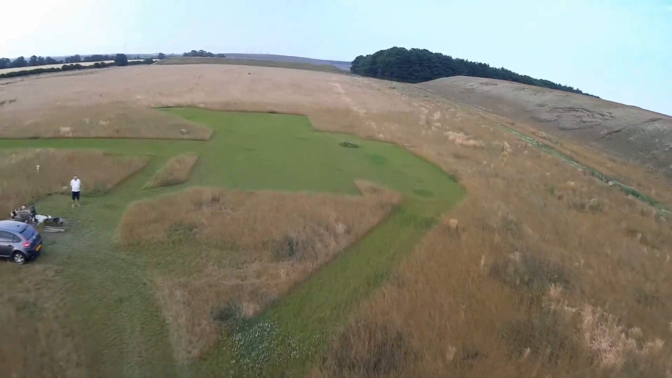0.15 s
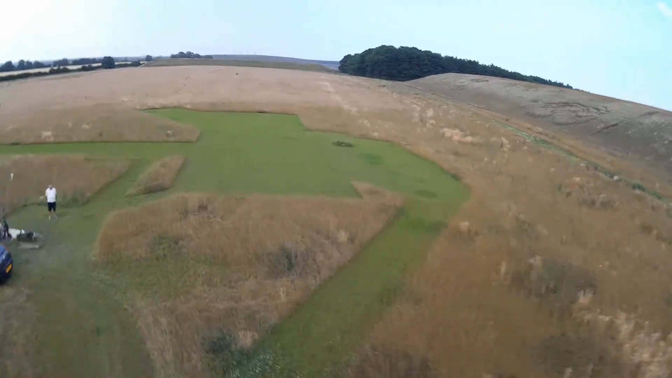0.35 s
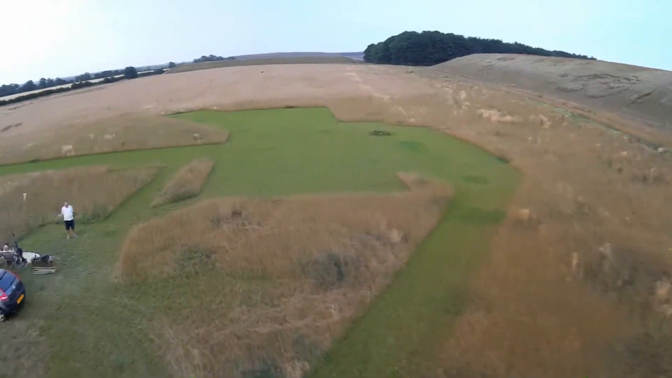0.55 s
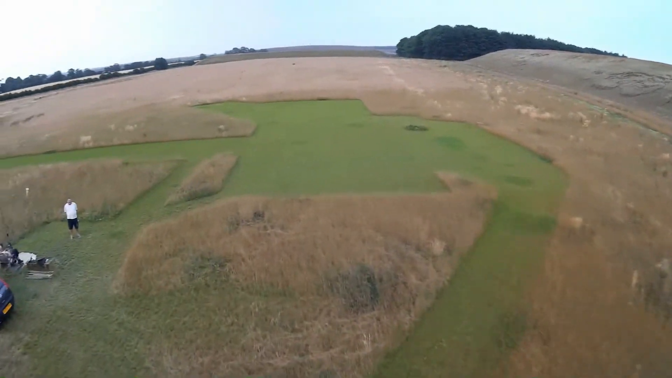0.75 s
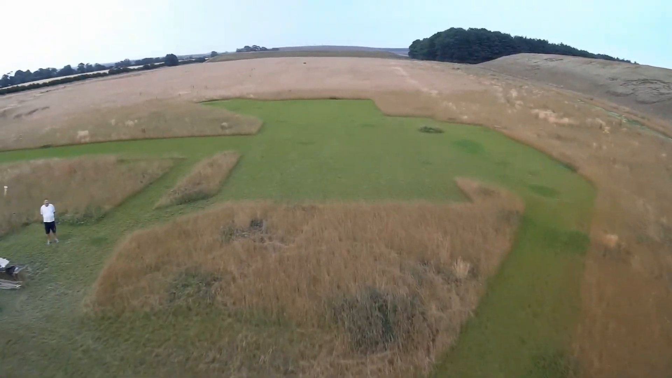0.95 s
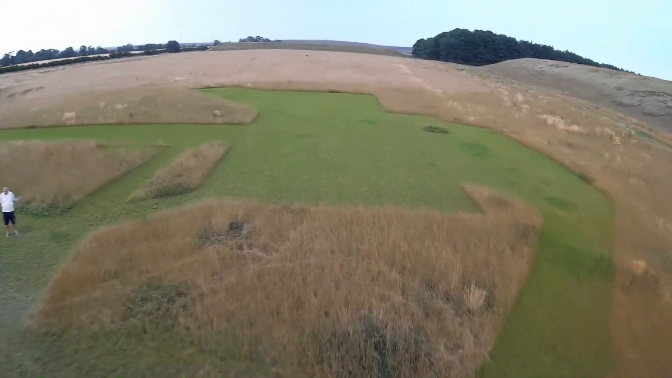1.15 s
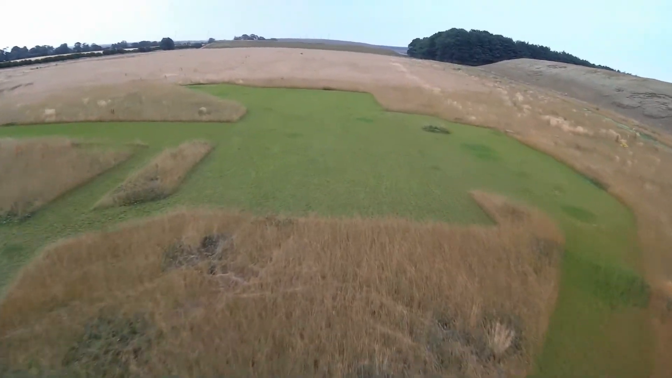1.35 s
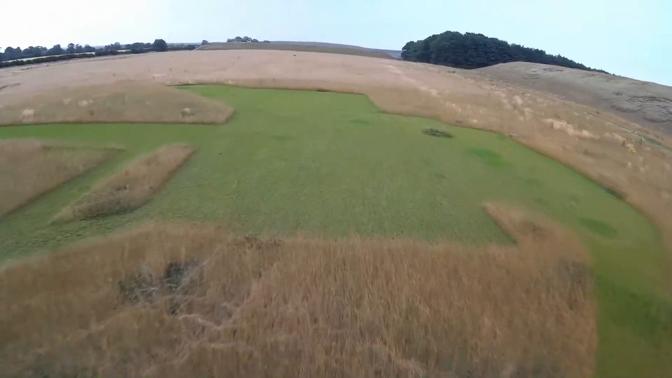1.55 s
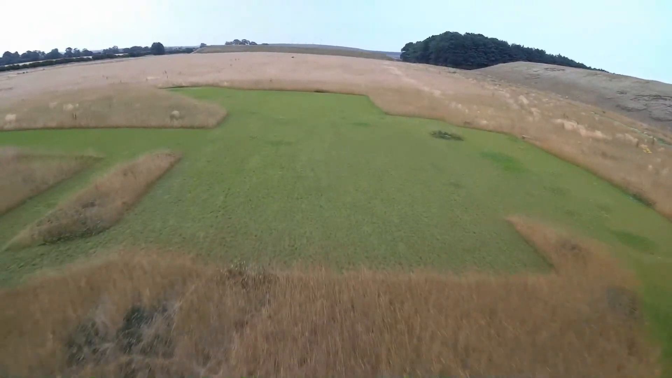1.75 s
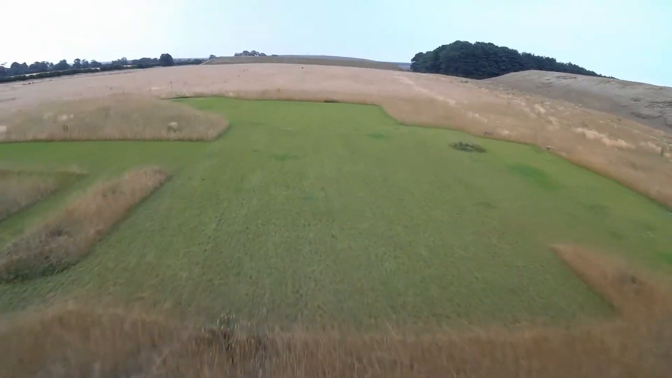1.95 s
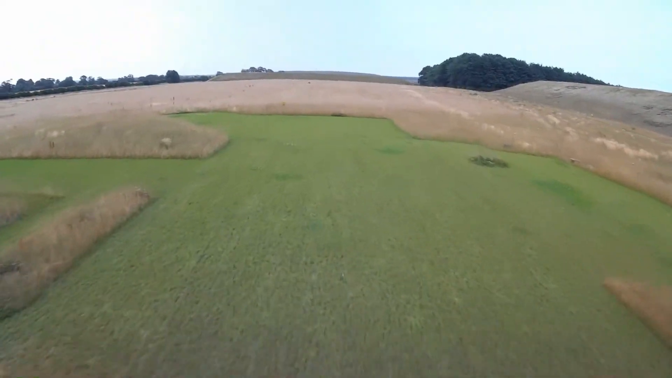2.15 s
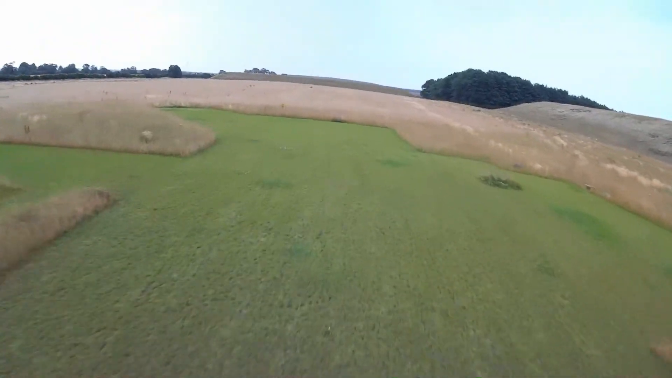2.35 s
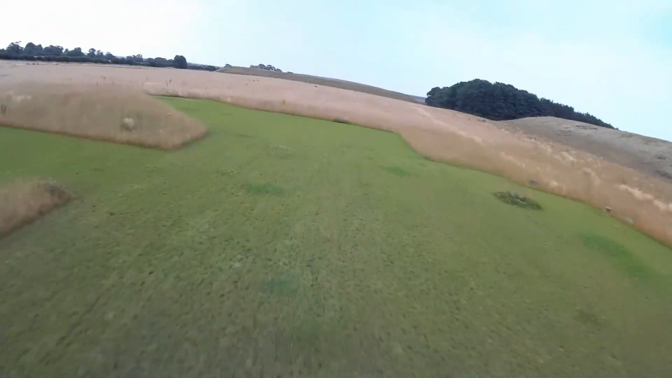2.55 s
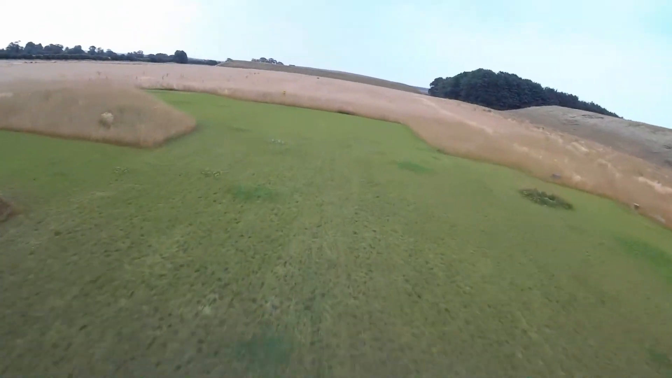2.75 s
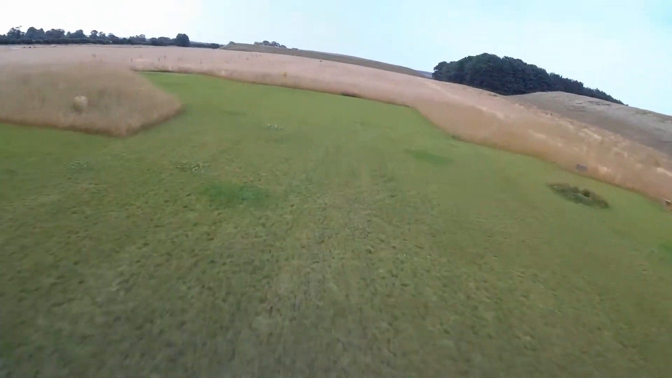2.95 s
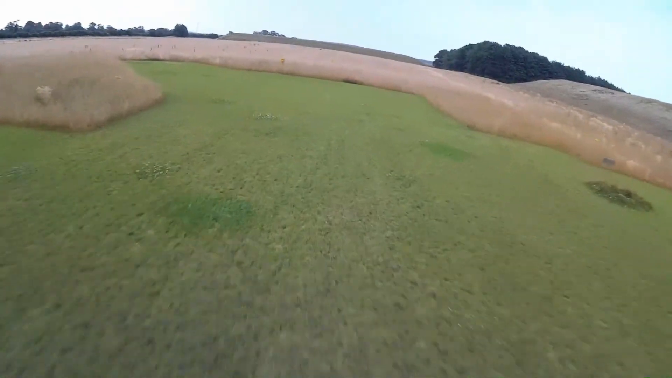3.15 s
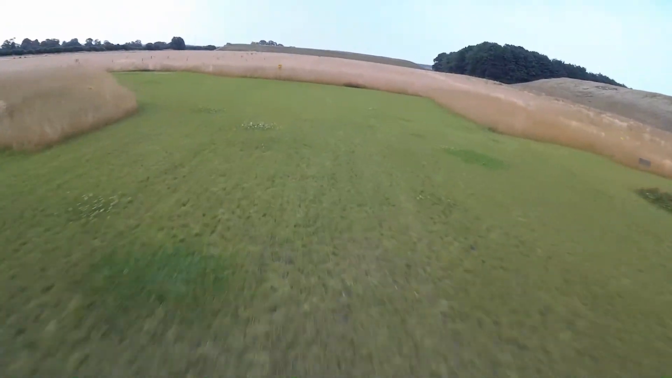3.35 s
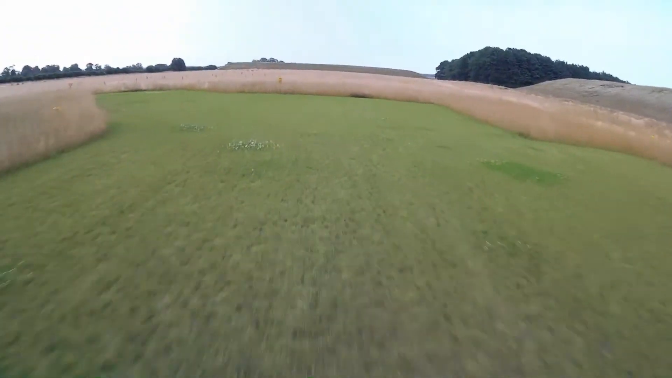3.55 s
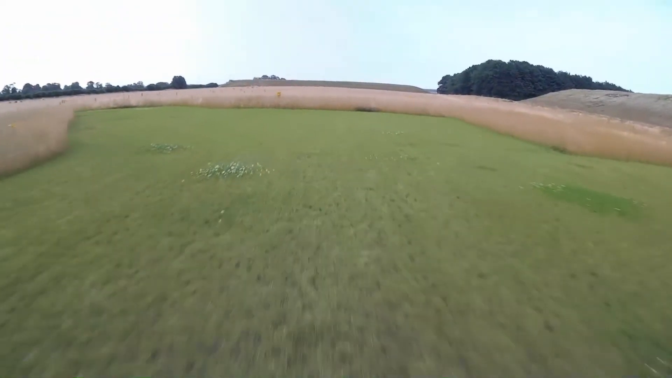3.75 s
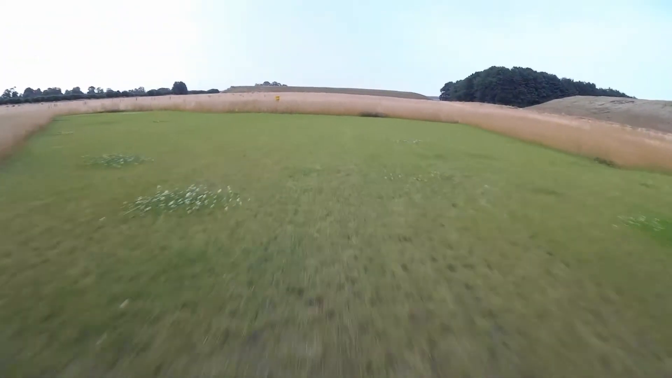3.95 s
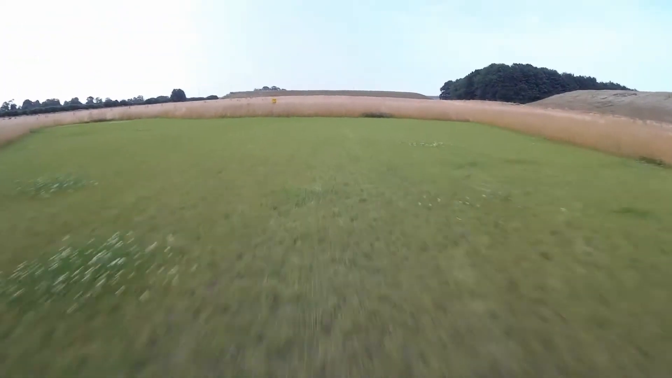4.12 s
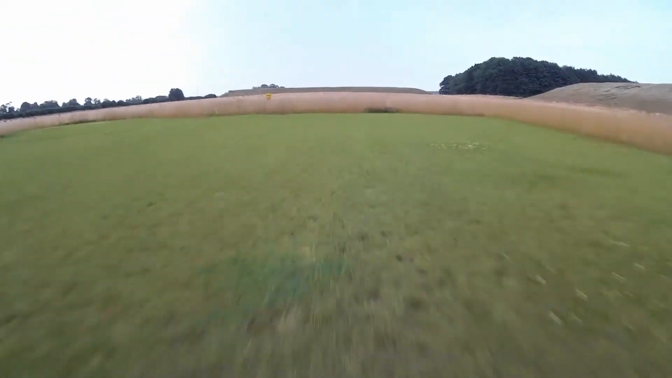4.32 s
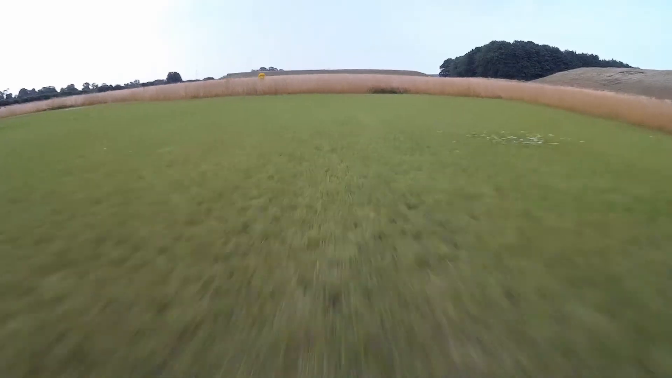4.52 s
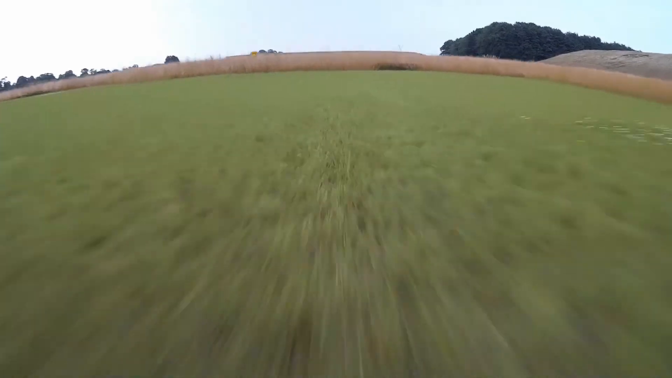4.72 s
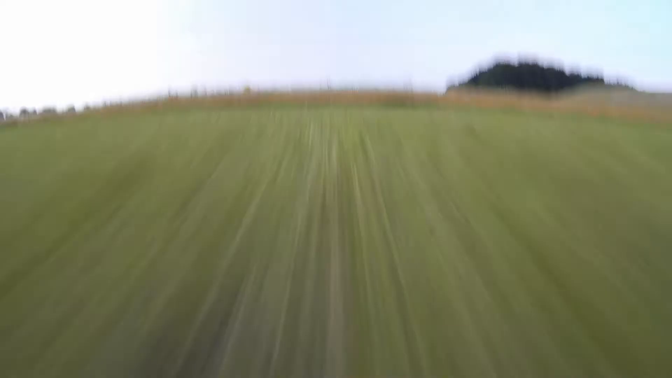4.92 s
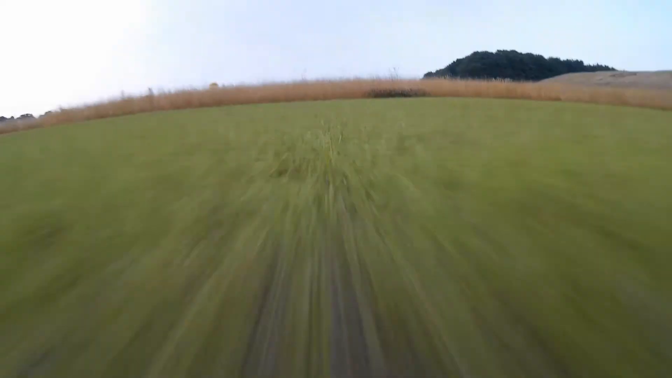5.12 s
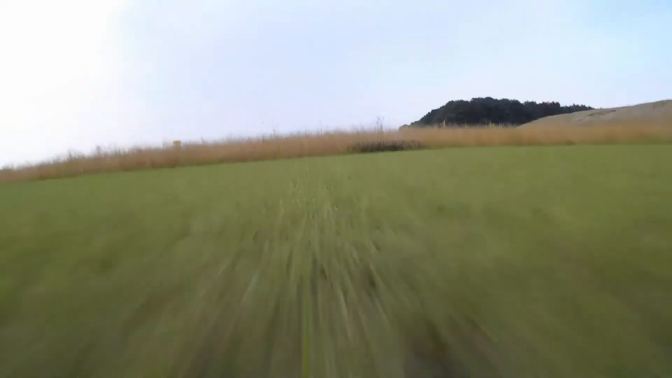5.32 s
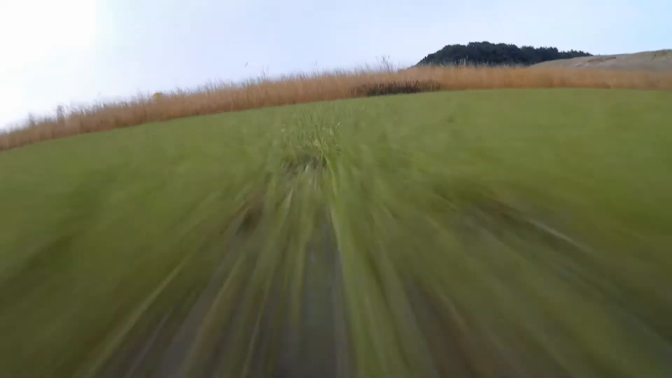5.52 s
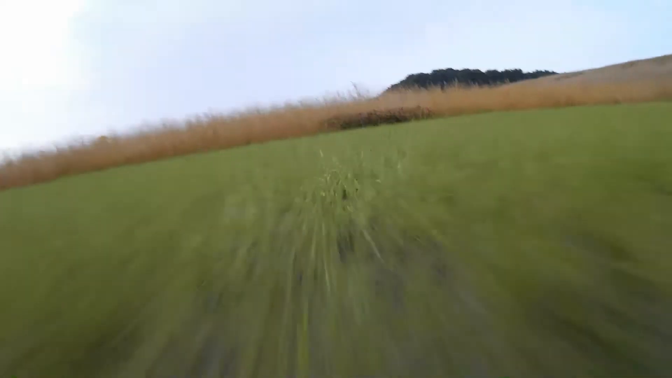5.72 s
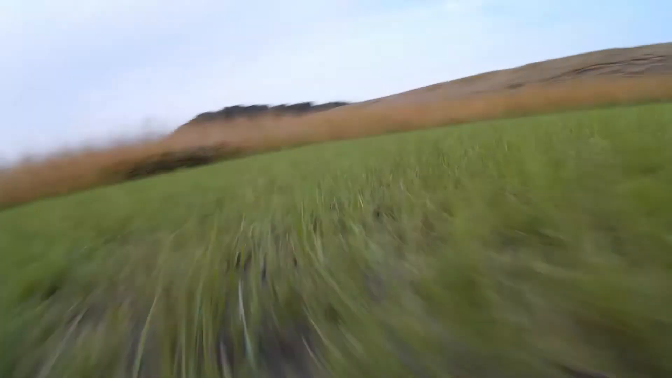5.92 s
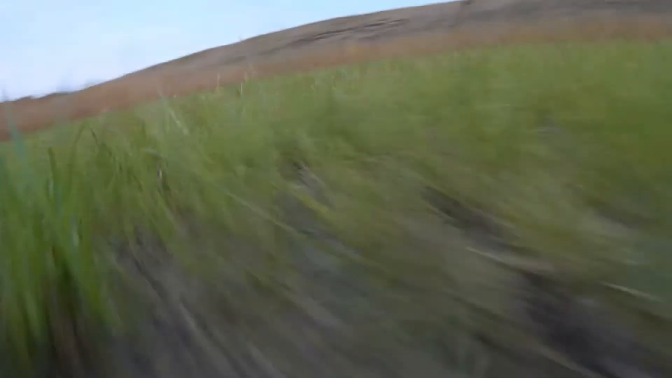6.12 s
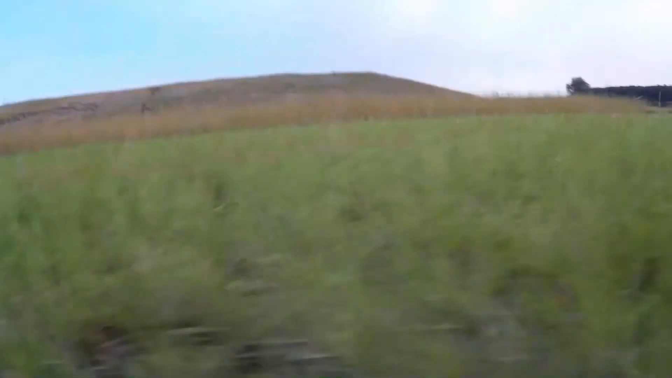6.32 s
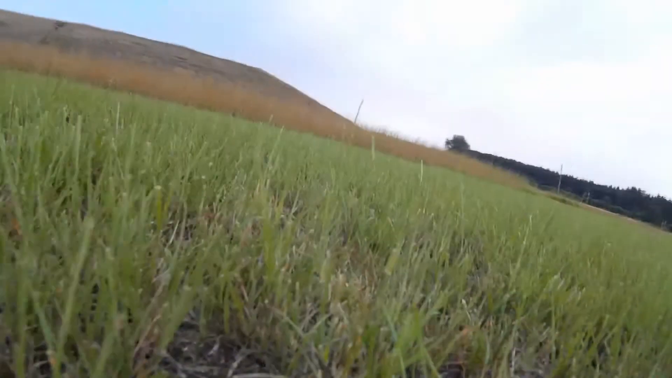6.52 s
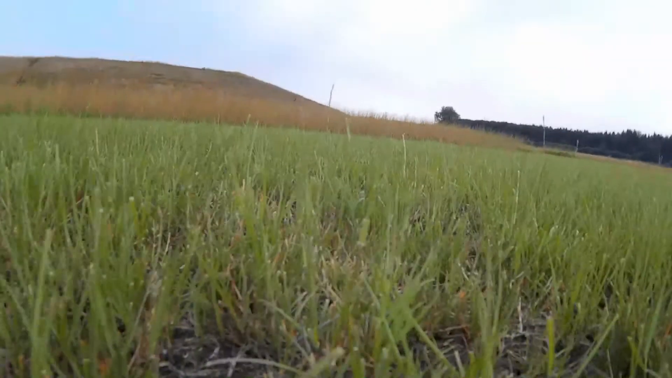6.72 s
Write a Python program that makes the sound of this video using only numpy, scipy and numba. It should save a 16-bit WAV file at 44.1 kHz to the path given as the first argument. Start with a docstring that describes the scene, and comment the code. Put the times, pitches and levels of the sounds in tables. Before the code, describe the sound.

From the start, wind rushes and rumbles over a microphone mounted on a small gliding model plane. A thin, high, fluttering whine wavers above it. Between about 0.3 and 0.7 seconds a gust adds a ragged hiss and a low roar. Brief rising chirps and soft thumps of rough air come and go until around 4 seconds, while the wind eases slightly.

Just before 5 seconds the belly hits mown grass with a loud crunch and thud, and the whine quickly dies. The plane bounces again at about 5.3, 5.6 and 5.9 seconds, each time with a scrape, while stalks crack and knock against the hollow body. The loudest hits overload. The wind fades as the plane slows, and weaker bumps follow from 6.1 to 6.5 seconds. A faint grass squeak and a last small tick come near 6.7 seconds as it settles.

```python
"""Rushing wind and a thin, fluttering whine ride along with a small electric model plane as it glides in.
Air buffets a microphone on the airframe, sweeps over the body and whistles in a gap; one early gust
tears the flow loose. Near 5 s the belly hits mown grass and skips through it in shrinking bounces:
the ground thuds, blades crunch, stalks rap the hollow shell and the loudest hits overload."""
import sys
import numpy as np
from scipy import signal
from scipy.fft import rfft, irfft
from scipy.io import wavfile
from scipy.ndimage import uniform_filter1d
from numba import njit

SR = 44100
rng = np.random.default_rng(int(sys.argv[2]) if len(sys.argv) > 2 else 0)


def transcribe(u):
    """Save the signal u as a 16-bit wav file named by the first command-line argument.

    u: samples, shape (n,) or (channels, n), limited to [-1, 1]; the rate is SR.
    q: integer samples, one column per channel.
    """
    v = np.clip(np.atleast_2d(u).T, -1, 1)
    q = np.round(v * 32767).astype(np.int16)
    wavfile.write(sys.argv[1], SR, q)


N = 298557
T = np.arange(N) / SR
TOUCHDOWN_S = 4.918

# the belly digs in at each bounce:
# t/s, length/s, scrape/dB, shell boom/dB, brushing/dB, brushing decay/s, ground thud/dB
BOUNCES = [(4.946, 0.081, 1, -10, -2.5, 0.027, -14), (5.252, 0.11, -2.5, -7, -5, .035, -29),
           (5.584, 0.082, 0, -6, -10, 0.094, -15), (5.845, 0.11, -5.5, -9, -6, 0.042, -19),
           (6.136, 0.063, -27, -16.5, -15.5, .03, -19.5), (6.189, 0.055, -10, -9, -24, 0.074, -15.5),
           (6.321, 0.12, -18.5, -21.5, -32, 0.12, -26), (6.531, 0.034, -21.5, -30.5, -32.5, 0.018, -45)]


def undb(db):
    """Decibels to gain."""
    return 10 ** (np.asarray(db) / 20)


def unit(x):
    """Scale to rms 1."""
    return x / np.sqrt(np.mean(x ** 2))


def noise():
    """White noise."""
    return rng.standard_normal(N)


def walk(rate):
    """Smooth random modulator, rms 1: levels held 1 / rate s and slewed twice."""
    hold = max(int(SR / rate), 2)
    steps = np.repeat(noise()[:N // hold + 1], hold)
    return unit(uniform_filter1d(uniform_filter1d(steps, hold), hold)[:N])


def colour(x, spectrum):
    """EQ through points of f/Hz, level/dB."""
    hz, db = np.transpose(spectrum)
    f = np.maximum(np.fft.rfftfreq(N, 1 / SR), 1)
    return irfft(rfft(x) * undb(np.interp(np.log(f), np.log(hz), db)), N)


@njit
def svf(x, hz, width):
    """State-variable band-pass whose centre and width may move."""
    y, band_state, low_state = np.empty(len(x)), 0., 0.
    for i in range(len(x)):
        g, damping = np.tan(np.pi * min(hz[i] / SR, .45)), width[i] / hz[i]
        band = (band_state + g * (x[i] + 1e-18 - low_state)) / (1 + g * (g + damping))
        band_state, low_state = 2 * band - band_state, low_state + 2 * g * band
        y[i] = damping * band
    return y


def ring(x, hz, width_hz):
    """One resonance, gain 1 at its centre."""
    return svf(x, hz * np.ones(N), width_hz * np.ones(N))


def sing(hz, width_hz):
    """Pitched noise from a steep-sided resonance, rms 1."""
    return unit(ring(ring(noise(), hz, width_hz), hz, width_hz))


def swell(start, length, edge=1.0):
    """A rounded gate; edge is the share of it spent rising and falling."""
    progress = np.clip((T - start) / length, 0, 1)
    return np.sin(np.pi / 2 * np.clip(2 * np.minimum(progress, 1 - progress) / edge, 0, 1))


def grains(per_s, spread_db):
    """Random tiny impacts with a few large ones among them, rms 1."""
    size = undb(spread_db * np.minimum(rng.exponential(size=N), 4))
    return unit((rng.random(N) < per_s / SR) * size * np.sign(noise()))


def ground_time():
    """Seconds since touchdown, zero in flight."""
    return np.maximum(T - TOUCHDOWN_S, 0)


def grounded(rise_s=.06):
    """Ramp from 0 in flight to 1 on the grass."""
    return np.clip(ground_time() / rise_s, 0, 1)


def wind():
    """The air bed: eddies buffet the microphone, smoother air rushes over the hollow body."""
    # pockets of rough air that thump the microphone: t/s, length/s, lift/dB
    pockets = [(.74, 0.12, 4), (1.6, .26, 1.5), (1.923, .13, 3), (2.708, .21, 3.5), (3.403, .3, 3.5),
               (3.697, 0.46, 3.5), (5.424, .18, 5.5)]
    # low rumble of the eddies: f/Hz, level/dB
    buffet_eq = [(15, -12), (30, -5), (60, -1), (100, 0.5), (145, -4), (210, -2.5), (300, -3.5), (450, -13),
                 (800, -19), (2000, -79)]
    # airflow over the body: f/Hz, level/dB
    rush_eq = [(100, 2), (350, -0.5), (600, 0.5), (900, -1), (1150, 2), (1400, 2.5), (1650, 0),
               (1850, -2.5), (2100, -9.5), (2600, -21.5), (3500, -16.5), (6000, -32), (10000, -89)]
    pockets_db = sum(db * swell(start, length) for start, length, db in pockets)
    # the plane slows gently in the glide, sharply at the first blow, then quickly on the grass
    brake_db = 1.7 * grounded(rise_s=.16)
    buffet_db = -18.5 - .08 * T - brake_db - 10.5 * ground_time() + pockets_db + .5 * walk(9)
    rush_db = -15 - .5454 * T - brake_db - 11.5 * ground_time() + .12 * pockets_db
    buffet = unit(colour(noise(), buffet_eq)) * undb(buffet_db)
    # strong buffeting makes the wing drum, which grows faster than the eddies do
    drum = sing(140, width_hz=147) * undb(1.93 * (buffet_db + 15) - 13.5)
    rush = unit(colour(noise(), rush_eq)) + undb(-5.5) * sing(1512, width_hz=530)
    return buffet + drum + rush * undb(rush_db + .72 * walk(40))


def edge_tone(hz, width_hz, octave_db):
    """Air splitting on an edge: a breathy whistle with its octave."""
    return sing(hz, width_hz) + undb(octave_db) * sing(2 * hz, 2 * width_hz)


def gap_whine():
    """Air across a gap whines with the airspeed, blows the cavity behind it and hisses."""
    # airspeed through the gap, as the pitch of its whine: t/s, f/Hz
    gap_flow = [(0, 4570), (.2, 4550), (.5, 5020), (.68, 4670), (.8, 4580), (1.2, 4230), (1.42, 4130),
                (1.54, 4480), (1.75, 4670), (2.03, 4820), (2.22, 4020), (2.6, 4180), (2.8, 4250),
                (3.08, 4410), (3.22, 4650), (3.45, 4350), (3.7, 4330), (4.9, 4040)]
    # the flow briefly stalls or flares: t/s, length/s, whine change/dB, cavity change/dB
    swings = [(0.015, 0.12, 2, 4.5), (0.502, 0.11, -1, 6), (1.2, 0.12, -8, -1), (1.377, .09, -3.5, 0),
              (2.526, 0.11, -13, -11), (2.62, 0.054, 1, 5), (3.164, 0.1, 0, 7.5), (3.487, .08, 3.5, 4),
              (4.3, 0.18, -2.5, -3)]
    # bright hiss of the gap: f/Hz, level/dB
    hiss_eq = [(1000, -15), (2500, 12.5), (4500, 14), (5600, 7.5), (6500, 2.5), (7600, -0.5), (9100, -2.5),
               (9700, -3), (10400, -49)]
    cruise_hz, barely_blown_hz, fully_blown_hz = 4510, 4200, 5100
    hz = np.interp(T, *np.transpose(gap_flow))
    # faster flow is louder, up to a ceiling; both voices die fast on the grass
    above_cruise_khz = (hz - cruise_hz) / 1000
    landing_loss_db = 42 * ground_time()
    whine_db = np.minimum(-31.5 + 7.5 * above_cruise_khz, -30) - .11 * T - landing_loss_db
    cavity_db = np.minimum(-28 + 16 * above_cruise_khz, -20) - 1.2 * T - landing_loss_db
    for start, length, whine_change_db, cavity_change_db in swings:
        swing = swell(start, length)
        whine_db += whine_change_db * swing
        cavity_db += cavity_change_db * swing
    # each eddy through the gap lifts pitch and loudness at once
    eddy = walk(45)
    whine = edge_tone(hz * (1 + .03 * eddy), width_hz=540, octave_db=-18) * undb(whine_db + 1.1 * eddy)
    # harder blowing pulls the cavity's note up and makes it purer and steadier
    blowing = np.clip((hz - barely_blown_hz) / (fully_blown_hz - barely_blown_hz), 0, 1)
    cavity_hz = 3040 + 560 * blowing + 30 * eddy
    cavity_width_hz = np.interp(blowing, [0, .6], [500, 230])
    sputter_db = 2.2 * (1 - blowing) * walk(70)
    cavity = sing(cavity_hz, cavity_width_hz) * undb(cavity_db + sputter_db)
    # the hiss follows the whine's level and shares its fast flutter
    hiss_db = 1.05 * (whine_db + 34.5) - 32.5
    hiss = unit(colour(grains(per_s=7000, spread_db=6), hiss_eq)) * undb(hiss_db)
    flutter = undb(1.9 * walk(130))
    return (whine + hiss) * flutter + cavity


def chirps():
    """In each surge of air the edge tone jumps to a higher note, nearly always rising."""
    # surges through the gap: t/s, length/s, first pitch/Hz, last pitch/Hz, level/dB
    surges = [(.24, .04, 5540, 5740, -25.5), (.28, 0.042, 5300, 5150, -30),
              (.675, 0.076, 5140, 5730, -22.5), (1.73, 0.061, 4970, 6050, -24),
              (1.82, 0.066, 5100, 6000, -24), (1.92, 0.076, 4770, 5240, -26),
              (1.98, 0.066, 5200, 5950, -29), (2.9, 0.035, 5270, 6200, -30), (3.24, 0.047, 5060, 5270, -24),
              (3.285, 0.06, 5130, 5200, -26.5), (3.495, 0.021, 4870, 5630, -30)]
    hz, gain = np.full(N, float(surges[0][2])), 0
    for start, length, first_hz, last_hz, db in surges:
        sweep_hz = np.interp(T, [start, start + length], [first_hz, last_hz])
        hz = np.where(T > start, sweep_hz, hz)
        gain = gain + undb(db) * swell(start, length, edge=.9)
    whistle = edge_tone(hz, width_hz=840, octave_db=-11)
    breath = undb(-5.5) * sing(1.07 * hz, width_hz=2200)
    return gain * (whistle + breath)


def gust():
    """The flow tears loose: a ragged hiss holds while a low roar crests in its middle."""
    # broad hiss of the separated flow: f/Hz, level/dB
    hiss_eq = [(300, -5), (1000, 3), (2000, -1.5), (2900, -0.5), (3500, 2), (4100, -6), (5500, -10),
               (6500, -12), (9000, -14.5), (10500, -27.5)]
    # the roar beneath it: f/Hz, level/dB
    roar_eq = [(60, -18), (150, 1.5), (260, 9), (380, 6.5), (600, -1.5), (1000, -5.5), (2000, -54.5)]
    crest_s, half_width_s = .47, .11
    crest = 1 / (1 + ((T - crest_s) / half_width_s) ** 2)
    hiss = unit(colour(noise(), hiss_eq)) * undb(-15.5 + 1.5 * walk(201))
    roar = unit(colour(noise(), roar_eq)) * undb(-7) * crest
    return swell(start=.271, length=.442, edge=.2) * (hiss + roar)


def turf():
    """Uneven ground shakes the airframe and thuds at each bounce; grass squeaks as the plane settles."""
    # ground rumble through the airframe: f/Hz, level/dB
    rumble_eq = [(15, 3.5), (40, -3.5), (95, -0.5), (150, -5), (250, -7.5), (400, -9.5), (700, -12),
                 (2000, -38)]
    stretch = 1.22  # a thud outlasts its scrape
    shake = grounded() * undb(-22.5 - 4 * ground_time())
    blows = sum(undb(thud_db) * swell(start, stretch * length) for start, length, *_, thud_db in BOUNCES)
    thuds = unit(colour(noise(), rumble_eq)) * (shake + blows) * undb(2 * walk(50))
    squeak = sing(4060, width_hz=600) * swell(start=6.665, length=.097, edge=.4)
    return thuds + squeak * undb(-35 + 4.2 * walk(120))


def shell(x):
    """The hollow airframe rings with whatever touches it."""
    # resonances of the shell: f/Hz, width/Hz, level/dB
    modes = [(1250, 300, 5.5), (1510, 440, 4.5), (2483, 410, 2.5), (3406, 330, 4.5), (3750, 420, 0.5),
             (4575, 370, -2), (5580, 290, 0.5), (6040, 300, -4), (7120, 1140, -9), (8470, 1950, -12),
             (9730, 770, -11)]
    return sum((-1) ** k * undb(db) * ring(x, hz, width) for k, (hz, width, db) in enumerate(modes))


def belly_depth():
    """Depth in the grass, as a gain: a light slide that peaks in the middle of each bounce."""
    lead_s = .052
    depth = undb(-31 + ground_time())  # the slide creeps up 1 dB a second
    for start, length, _, _, brushing_db, decay_s, _ in BOUNCES:
        age = T - start - length / 2
        depth += undb(brushing_db) * np.exp(-np.abs(age) / np.where(age < 0, lead_s, decay_s))
    return depth * grounded()


def grass_crunch():
    """Countless blades flick the shell; at each bounce the belly scrapes in and the shell booms."""
    soft_blades = grains(per_s=3500, spread_db=3.4)
    stiff_stalks = undb(-10) * grains(per_s=160, spread_db=1.7)
    flicks = unit(shell(soft_blades + stiff_stalks))
    # the flicks turn duller as the plane slows
    body = signal.sosfiltfilt(signal.butter(2, 6500, fs=SR, output="sos"), flicks)
    treble = (flicks - body) * undb(6 - 6 * ground_time())
    brushing = (body + treble) * belly_depth() * undb(2.13 * walk(220))
    scrape = unit(shell(grains(per_s=6000, spread_db=4.4)))
    boom = sing(1240, width_hz=1140)
    digs = sum(swell(start, length) * (undb(scrape_db) * scrape + undb(boom_db) * boom)
               for start, length, scrape_db, boom_db, *_ in BOUNCES)
    crunch = brushing + digs * undb(.59 * walk(170))
    # the light shell radiates little below its first resonance
    return signal.sosfilt(signal.butter(2, 520, "high", fs=SR, output="sos"), crunch)


def stalk_raps():
    """Stiff stalks snap against the shell: each a crack of a few milliseconds and a duller knock."""
    # stalks and tufts striking: t/s, level/dB, knock offset/dB
    hits = [(4.9371, -7, 7), (5.051, 5, -22), (5.0824, -6, -13), (5.208, 8.5, -10), (5.223, 5, -9),
            (5.239, -4, 3.5), (5.3983, -3, -11), (5.441, -2.5, -11), (5.5255, -7, -23), (5.5647, 6.5, -17),
            (5.5742, 5, -13), (5.6852, -1, 0), (5.698, -4, 4), (5.7284, -6, -8), (5.812, -1, -2),
            (5.8242, 6, -8), (5.8416, 8, -6), (5.856, 7.5, -1), (5.9392, 13, -12), (5.971, -2.5, 7),
            (6.0831, -1.5, -0.5), (6.1093, -3, -2), (6.1224, -5.5, 2), (6.2954, -9, -7), (6.376, -3, -8),
            (6.736, -15, -9)]
    attack_s, decay_s = .00051, .0015
    crack_env, knock_env = np.zeros(N), np.zeros(N)
    for start, db, knock_db in hits:
        age = np.maximum(T - start, 0)
        push = undb(db) * (1 - np.exp(-age / attack_s)) * np.exp(-np.minimum(age / decay_s, 20))
        crack_env += push
        knock_env += push * undb(knock_db)
    cracks = shell(crack_env * noise()) / np.std(shell(noise()))
    knocks = knock_env * sing(1220, width_hz=1100)
    return undb(-1.5) * cracks + undb(-2.5) * knocks


def scene():
    """Everything reaches one point on the airframe: nearly mono, with a faint diffuse side signal."""
    # stereo width, side relative to mid: f/Hz, level/dB
    side_eq = [(30, -40), (250, -32.5), (700, -26.5), (1400, -26), (2200, -20), (4000, -19.5), (6000, -16),
               (10000, -17)]
    mid = wind() + gap_whine() + chirps() + gust() + grass_crunch() + stalk_raps() + turf()
    # a wandering phase keeps the envelope but gives the side no direction
    wander = np.exp(1j * np.cumsum(.12 * noise()))
    side = colour(np.real(signal.hilbert(mid) * wander), side_eq)
    return np.array([mid + side, mid - side])


def record(dry):
    """Soft overload into a narrow band; the loudest peaks still clip at full scale with a fizz."""
    ceiling, band_hz, fizz_top_hz = .96, 10600, 16000
    saturated = dry / (1 + np.abs(dry / ceiling) ** 8) ** (1 / 8)
    narrow = signal.sosfilt(signal.ellip(12, .2, 80, band_hz, fs=SR, output="sos"), saturated)
    clipped = np.clip(narrow, -1, 1)
    return signal.sosfilt(signal.ellip(8, .2, 70, fizz_top_hz, fs=SR, output="sos"), clipped)


dry = scene()
out = record(dry)
transcribe(out)
```